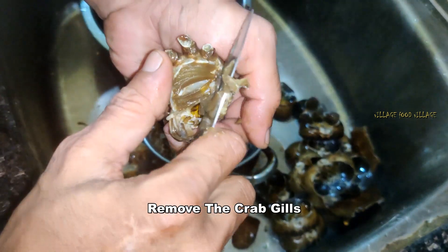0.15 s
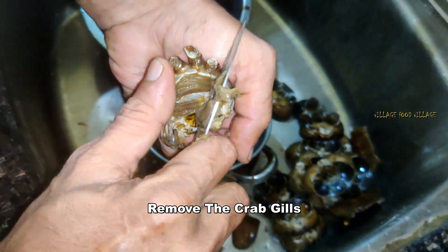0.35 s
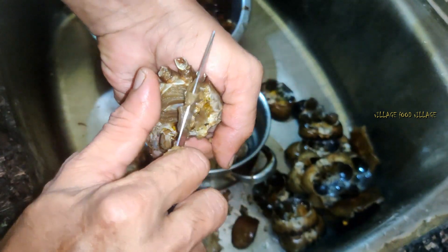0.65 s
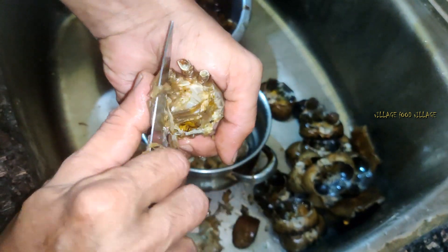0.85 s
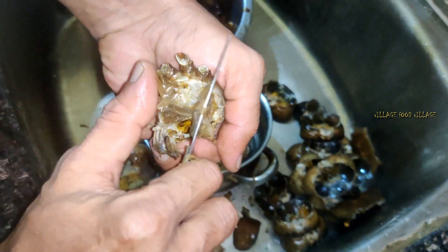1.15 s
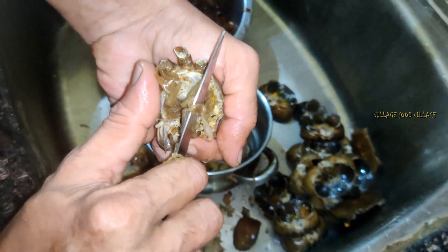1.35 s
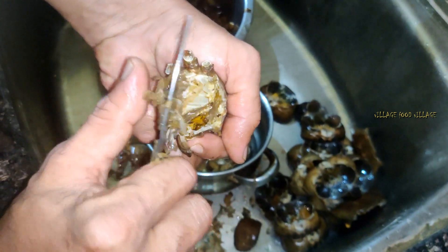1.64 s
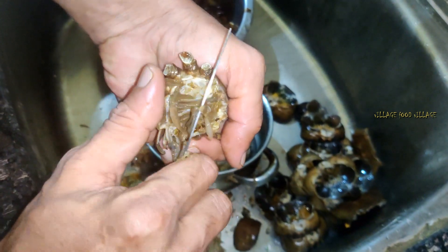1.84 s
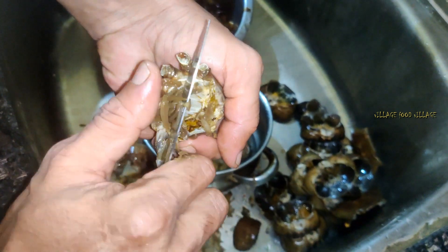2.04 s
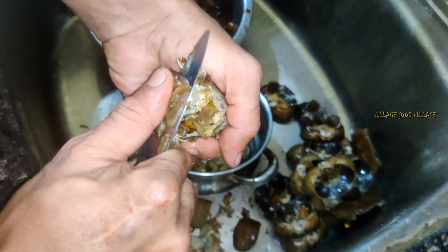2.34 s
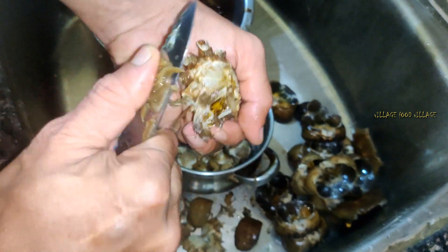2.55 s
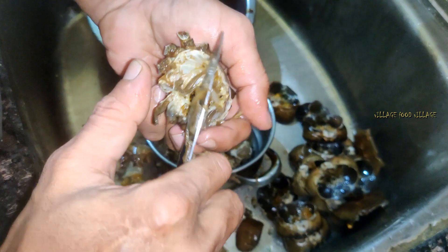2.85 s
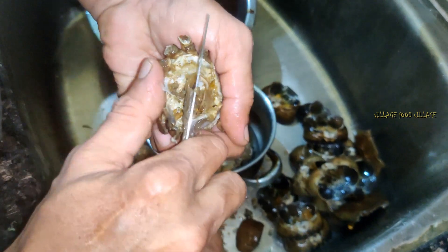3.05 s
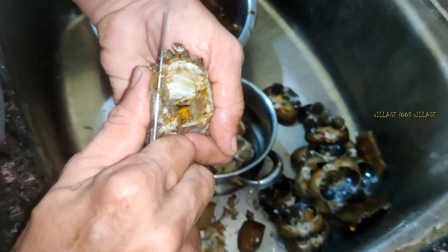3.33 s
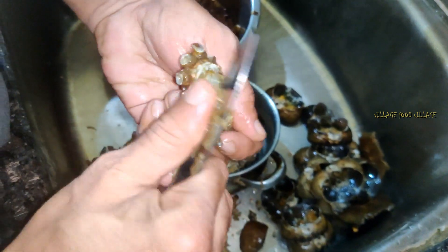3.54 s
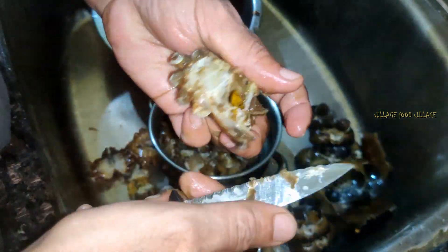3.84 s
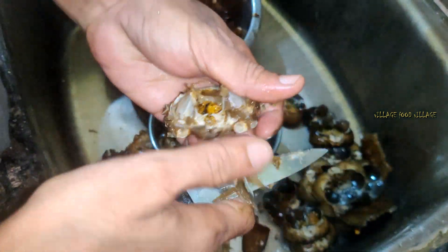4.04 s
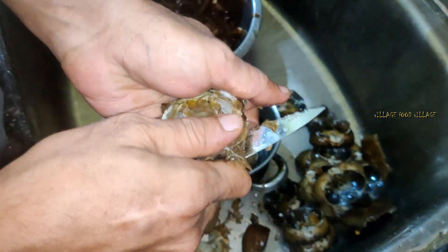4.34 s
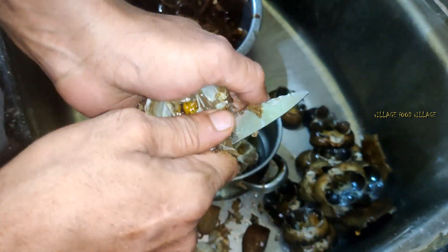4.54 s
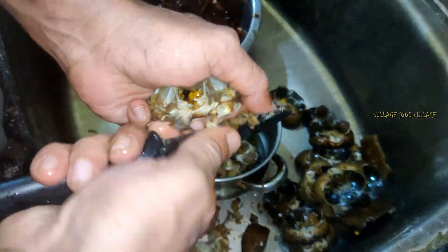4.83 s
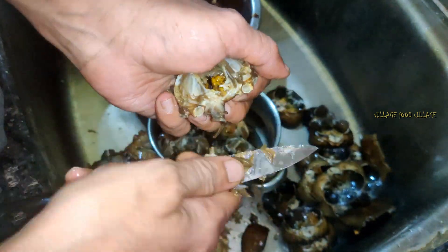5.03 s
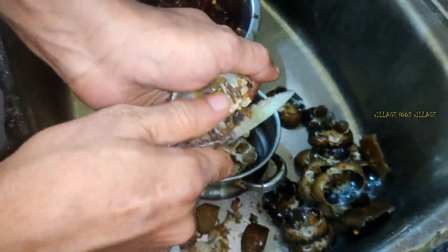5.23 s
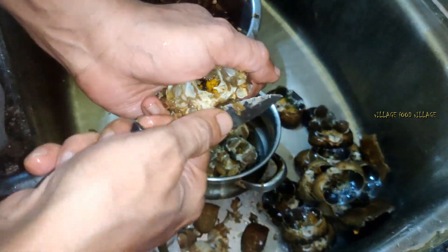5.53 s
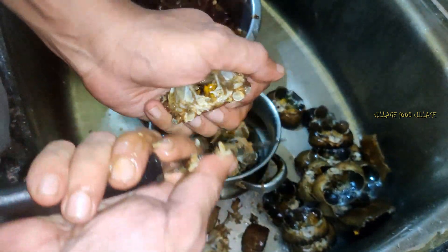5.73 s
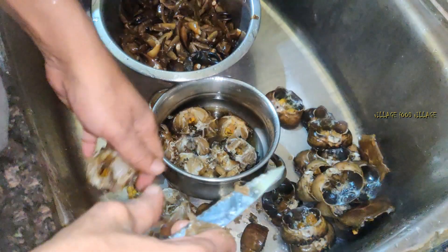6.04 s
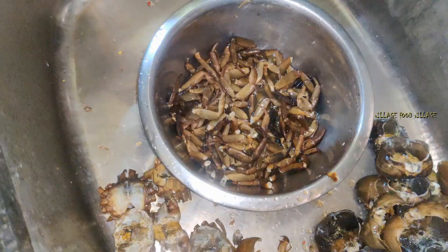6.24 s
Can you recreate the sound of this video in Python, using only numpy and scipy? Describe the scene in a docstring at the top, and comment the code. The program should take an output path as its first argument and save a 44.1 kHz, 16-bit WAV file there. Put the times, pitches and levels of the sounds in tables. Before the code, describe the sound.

Sharp little shell snaps and wet crackling as a knife cleans a crab, then a steel bowl bumps down, over a low hum.

```python
"""Sharp little snaps and a wet crackle sound close by, over a low motor hum in a kitchen.
A small crab is being cleaned over a steel sink: gills and bits of shell snap off under a knife.
Fingers shift their grip on the wet flesh, and two scraps drop and set the sink ringing.
A steel bowl slides, is knocked and bumps down; the sound is cut off, leaving hum, rumble and hiss.
The two microphone ports (its left and right openings) each ring in the treble in their own way."""
import sys
import numpy as np
from scipy import signal
from scipy.fft import rfft, irfft, next_fast_len
from scipy.io import wavfile

SR = 44100
rng = np.random.default_rng(int(sys.argv[2]) if len(sys.argv) > 2 else 0)


def wav_record(signal):
    """Record a signal, one row per channel, as 16-bit PCM in the file named by sys.argv[1]."""
    frames = np.transpose(np.atleast_2d(signal))
    bounded = np.clip(frames, -1, 1)
    # unit amplitude maps onto the largest positive 16-bit level
    quanta = np.round(bounded * 32767).astype(np.int16)
    wavfile.write(sys.argv[1], SR, quanta)


N = 281358
TIME = np.arange(N) / SR
CUT_S = 6.2685   # the moment all sound but the background is cut off

# the shell snapping under the blade: start_s, level_db (near 5 kHz), length_s, brightness_db, pitch_hz
SHELL_SNAPS = [(0.873, -9.5, 0.0033, -8.5, 1980), (1.421, -14.5, .003, -26, 1930),
               (1.5228, -13.5, .0012, 0.5, 1670), (1.532, -8.5, 0.0031, -9, 730),
               (1.887, -13.5, .002, -4, 2050), (1.9403, -3.5, 0.00076, 0, 1870),
               (1.974, -10, 0.0037, -18, 2100), (2.4333, -10.5, 0.0059, -2.5, 2100),
               (3.1834, 5, 0.0013, -2.5, 806), (3.2307, -0.5, 0.0037, -6, 2000),
               (3.239, -3, 0.0036, -16, 5670), (3.452, 0.5, .001, -4, 1740),
               (3.4822, -1.5, 0.0026, -11, 2250), (3.498, -4.5, 0.00099, -16, 2080),
               (3.614, -7.5, .004, -16, 1990), (3.669, -7.5, 0.0071, -19, 1950),
               (3.736, -5, .007, -19, 700), (4.2295, -12, 0.0028, -13, 2080),
               (4.7037, -10, 0.0014, -3, 2040), (4.7322, -2.5, 0.00069, -2.5, 1890),
               (4.779, 0, 0.00088, 0.5, 1800), (4.88, -9.5, 0.0012, -11, 1510),
               (4.895, -13, 0.0013, -16, 1620), (5.3712, -11.5, 0.0008, 5.5, 1950),
               (5.468, -14.5, 0.0041, -2, 1900), (5.4916, -12.5, 0.0012, -13, 1880),
               (5.531, -5.5, .001, -4, 1910), (5.539, -0.5, .0018, -11, 1800),
               (5.568, 5.5, 0.0019, -3, 1720), (5.7355, 1.5, .001, -3, 1540)]
# the tones at which the hand-held shell rings: pitch_hz, width_hz, level_db
SHELL_TONES = [(885, 980, -4), (1640, 270, -3.5), (3960, 1120, -0.5), (5650, 920, 3), (7560, 5000, -1),
               (10470, 3800, -1.5), (14600, 2400, -5)]


def from_db(db):
    """Turn decibels into a factor to multiply by."""
    return 10 ** (np.asarray(db) / 20)


def unit_energy(x):
    """Scale each channel so that its squared samples add up to 1."""
    return x / np.sqrt(np.sum(x ** 2, axis=-1, keepdims=True) + 1e-20)


def rms_one(x):
    """Scale each channel to an average strength (rms) of 1."""
    return unit_energy(x) * np.sqrt(x.shape[-1])


def add(track, start_s, sound):
    """Mix a short sound into a track."""
    at = int(start_s * SR)
    track[..., at:at + sound.shape[-1]] += sound[..., :N - at]


def colour(x, points):
    """Make some pitches louder and others softer, along a curve of (pitch_hz, gain_db) points."""
    size = 2 * next_fast_len(x.shape[-1] // 2 + 4096)
    hz, db = np.transpose(points)
    log_hz = np.log(np.fft.rfftfreq(size, 1 / SR) + 1)
    log_gain = np.log(from_db(np.interp(log_hz, np.log(hz), db)))
    # minimum phase: the filter rings only after a sound, never before it
    cepstrum = irfft(log_gain)
    cepstrum[1:size // 2] *= 2
    cepstrum[size // 2 + 1:] = 0
    return irfft(rfft(x, size) * np.exp(rfft(cepstrum)))[..., :x.shape[-1]]


def resonate(x, tones):
    """Let a sound ring at several tones of (pitch_hz, width_hz, level_db); narrow ones ring longer."""
    out = 0
    for k, (hz, width, db) in enumerate(tones):
        decay = np.exp(-np.pi * width / SR)
        poles = [1, -2 * decay * np.cos(2 * np.pi * hz / SR), decay * decay]
        ring = signal.lfilter([1, 0, -1], poles, x + 1e-18)
        out = out + (-1) ** k * from_db(db) * (1 - decay * decay) / 2 * ring
    return out


def dying_noise(fade_s, size):
    """A blur of echoes, different left and right, that falls by 60 dB in fade_s."""
    return unit_energy(rng.standard_normal((2, size)) * from_db(-60 * TIME[:size] / fade_s))


def struck(tones, spread, tilt_db=0.0, size=16000):
    """One blow rings tones of (pitch_hz, level_db, fade_s); spread puts left and right out of step."""
    t = TIME[:size]
    out = 0
    for hz, db, fade_s in tones:
        phase = np.pi * rng.integers(2) + spread * rng.standard_normal() * np.array([[1], [-1]])
        level_db = db + tilt_db * np.log2(hz / tones[1][0]) + rng.standard_normal()
        out = out + from_db(level_db - 60 * t / fade_s) * np.cos(2 * np.pi * hz * t + phase)
    return out * (1 - np.exp(-t / 0.001))


def grains(per_s, size_spread_db, decay_s):
    """Tiny puffs of noise at random moments, mostly small, a few large."""
    sizes = from_db(size_spread_db * np.minimum(rng.exponential(1, N), 4))
    starts = rng.random(N) < per_s / SR
    puffs = signal.lfilter([1], [1, -np.exp(-1 / (decay_s * SR))], sizes * starts + 1e-18)
    return puffs * rng.standard_normal((2, N))


def swells(rows):
    """A level that rises and falls smoothly for each row of (peak_s, level_db, half_length_s)."""
    return sum(from_db(db) * np.exp(-((TIME - peak_s) / half_s) ** 2) for peak_s, db, half_s in rows)


def drift(rate_hz):
    """Slow random wandering, typically about 1 in size."""
    falloff = 1 / (1 + (np.fft.rfftfreq(N, 1 / SR) / rate_hz) ** 2)
    return rms_one(irfft(rfft(rng.standard_normal(N)) * falloff, N))


def motor_hum(pitch_hz=100, level_db=-57, waver_depth=0.42, waver_hz=3.3):
    """A motor hums on one low note that wavers and now and then dips briefly."""
    # dips in the hum: lowest_s, missing_part_db (0 would be the whole hum), half_length_s
    dips = [(0.72, -3, 0.38), (1.7, -8.5, 0.51), (2.8, -4, 0.18)]
    waver = 1 + waver_depth * (drift(waver_hz) + 1j * drift(waver_hz))   # in level and phase
    tone = np.real(waver * np.exp(2j * np.pi * pitch_hz * TIME))
    return np.sqrt(2) * from_db(level_db) * (1 - swells(dips)) * tone


def kitchen_rumble(level_db=-54.5):
    """The kitchen rumbles; the bass is nearly the same left and right."""
    # tone colour of the rumble: pitch_hz, gain_db
    rumble_colour = [(20, 11.5), (30, 10), (48, -9), (65, 0), (82, -0.5), (125, 5.5), (200, -4.5),
                     (320, -7.5), (600, -11.5), (1200, -16.5), (3000, -36)]
    shared, side = rng.standard_normal((2, N))
    side = colour(side, [(30, -10), (100, -16.0), (300, -5.5), (700, -3.5), (1400, 2.0)])
    return from_db(level_db) * rms_one(colour(shared + side * [[1], [-1]], rumble_colour))


def microphone_hiss(left_db=-57.5, right_db=-56.5, after_cut_db=-3.5):
    """Each microphone makes its own hiss, which turns a little softer at the very end."""
    # tone colour of the hiss: pitch_hz, gain_db
    hiss_colour = [(100, -4.5), (1000, -3.5), (2000, 5.5), (2900, 2.5), (4500, 4.5), (9000, 1.5),
                   (16000, -2)]
    hiss = rms_one(colour(rng.standard_normal((2, N)), hiss_colour))
    return from_db([[left_db], [right_db]]) * hiss * from_db(after_cut_db * (TIME > CUT_S))


def soft_swell():
    """A faint, breath-like swell of soft noise."""
    # the rise and fall of the noise: peak_s, level_db, half_length_s
    swell_shape = [(5.12, -55, 0.21)]
    swell_colour = [(150, -13), (450, -2.5), (850, 0.5), (1500, -7.5), (3000, -20), (9000, -33)]
    return swells(swell_shape) * rms_one(colour(rng.standard_normal((2, N)), swell_colour))


def wet_fingers(holding_db=-65, crackle_db=-6.5, rub_db=-4.5):
    """Tiny films of water burst and skin rubs dully, louder whenever the fingers shift their grip."""
    # shifts of the grip: peak_s, level_db, half_length_s
    grips = [(0.05, -60, .2), (2.2, -56.5, 0.47), (3.8, -49, 0.39), (4.43, -52, 0.14), (4.95, -54, 0.26),
             (5.65, -53, 0.46)]
    film_colour = [(200, -4.5), (900, 8), (2000, 3), (2800, 0), (4000, -4), (8000, -5.5), (15000, -4)]
    rub_colour = [(70, -4.5), (150, -3.0), (280, -8.5), (500, -13), (2000, -26.5)]
    films = grains(per_s=380, size_spread_db=4.5, decay_s=0.0037)
    crackle = from_db(crackle_db) * rms_one(colour(films, film_colour))
    rub = from_db(rub_db) * rms_one(colour(rng.standard_normal(N), rub_colour))
    return (from_db(holding_db) + swells(grips)) * (crackle + rub)


def falling_scraps(ring_db=-9.5, splat_db=38.0):
    """Soft scraps land with a small wet splat and set the sink floor ringing."""
    # scraps hitting the sink: start_s, level_db
    landings = [(2.5736, -38), (2.590, -57), (2.610, -43), (3.733, -38.5), (3.753, -39.5), (3.775, -63)]
    # tones of the sink floor: pitch_hz, level_db, fade_s
    sink_tones = [(337, -20, 0.31), (432, -1.5, 0.35), (528, -1, 0.38), (614, -4.5, 0.32), (788, -10, 0.55),
                  (1020, -16, 0.33), (1285, -6, .2), (1810, 13.5, 0.021), (3040, 2, 0.068)]
    splat_colour = [(150, -15.0), (450, 8.0), (1200, -5.0), (3000, -12.0), (9000, -28)]
    out = np.zeros((2, N))
    for start_s, level_db in landings:
        splat = from_db(splat_db) * colour(dying_noise(fade_s=0.16, size=16000), splat_colour)
        ring = from_db(ring_db) * struck(sink_tones, spread=0.86)
        add(out, start_s, from_db(level_db) * (ring + splat))
    return out


def steel_bowl(clatter_fade_s=0.043, scrape_width_hz=50, lowest_hz=68):
    """The bowl scrapes along; each blow then rings it, booms in the sink and rattles crab legs inside."""
    # the bowl sliding before it knocks: time_s, level_db
    slide = [(6.06, -84), (6.13, -54.5), (6.19, -49), (6.21, -85)]
    # blows, brighter when hard: start_s, ring_db, hardness_db_per_octave, thud_db, clatter_db
    blows = [(6.195, -28.5, -1, -55, -3), (6.2024, -20.5, -9, -26, 1), (6.2359, -29.5, 9, -8, 20.5),
             (6.261, -38, 19, -36, -1)]
    # tones of the bowl: pitch_hz, level_db, fade_s
    bowl_tones = [(388, -10, 0.078), (534, 1.5, 0.18), (654, -2.5, 0.19), (747, 1, 0.082), (847, 0, 0.096),
                  (920, -11, 0.094), (1108, -1, 0.094), (1236, -8, 0.25), (1324, -7, 0.18),
                  (1536, -34, .12), (1800, -23, 0.72)]
    # low tones of the sink booming under it: pitch_hz, level_db, fade_s
    thud_tones = [(114, -10, 0.065), (180, 0, 0.066), (230, 1.5, 0.03), (320, -14, 0.086)]
    clatter_colour = [(60, -8), (250, -7.0), (800, 7), (2200, -3.5), (2800, -15.0), (6000, -14.0),
                      (9000, -18.5), (15000, -27)]
    scrape_tones = [(hz, scrape_width_hz, db) for hz, db, _ in bowl_tones]
    scrape = rms_one(resonate(rng.standard_normal((2, N)), scrape_tones))
    out = from_db(np.interp(TIME, *np.transpose(slide))) * scrape
    for start_s, ring_db, hardness, thud_db, clatter_db in blows:
        clatter = from_db(clatter_db) * colour(dying_noise(clatter_fade_s, size=16000), clatter_colour)
        ring = from_db(ring_db) * struck(bowl_tones, spread=0.79, tilt_db=hardness)
        thud = from_db(thud_db) * struck(thud_tones, spread=0.073)
        add(out, start_s, ring + thud + clatter)
    # thin steel gives off no deep bass
    bass_cut = signal.butter(4, lowest_hz, "high", fs=SR, output="sos")
    return signal.sosfilt(bass_cut, out) * from_db([[0.5], [-0.5]])   # slightly to the left


def shell_crunch(strain_s=0.0028, tearing_s=0.012, crunch_db=-47.5):
    """The shell crackles under strain just before each snap and goes on tearing after it."""
    from_snap_s = TIME[:8820] - .05
    rise_and_fall = np.exp(np.minimum(from_snap_s / strain_s, -from_snap_s / tearing_s))
    strain = np.zeros(N)
    for start_s, level_db, *_ in SHELL_SNAPS:
        add(strain, start_s + from_snap_s[0], from_db(level_db) * rise_and_fall)
    crackle = grains(per_s=450, size_spread_db=6.0, decay_s=0.00095)
    return from_db(crunch_db) * strain * rms_one(resonate(crackle, SHELL_TONES))


def shell_crack(length_s, fewest=4.2, per_s=2000, most=20, size=2048):
    """A crack runs through the shell as tiny breaks, more of them the longer it runs."""
    delays_s = np.minimum(length_s * rng.exponential(1, most), 2.5 * length_s)
    used = np.clip(fewest + per_s * length_s - np.arange(most), 0, 1)
    strengths = from_db(rng.normal(0, 4.0, most)) * used
    delays_s[0], strengths[0] = 0, from_db(3.0)   # a hard first break
    clicks = np.zeros((1, size))
    np.add.at(clicks[0], (delays_s * SR).astype(int) % size, rng.choice([-1, 1], most) * strengths)
    # hands and blade scatter the clicks on their way to the ports
    paths = from_db(1.0) * dying_noise(fade_s=0.026, size=size)
    paths[0, 0] += 1   # the straight path to the left port
    paths[1, 6] += 1   # the right port is a little farther away
    return signal.fftconvolve(clicks, paths, axes=1)[:, :size]


def shell_ring(crack, band_levels_db, hollow_hz, hollow_width_hz=230, hollow_db=9.0):
    """A crack rings the shell and the hollow inside it; four pitch bands each get their own level."""
    # the body, middle, crispness and fizz of a snap: low_hz, high_hz
    bands = [(600, 2500), (3200, 7300), (7300, 11500), (11500, 17000)]
    ring = resonate(crack, SHELL_TONES) - resonate(crack, [(hollow_hz, hollow_width_hz, hollow_db)])
    out = 0
    for (low_hz, high_hz), db in zip(bands, band_levels_db):
        band = signal.sosfilt(signal.butter(3, [low_hz, high_hz], "band", fs=SR, output="sos"), ring)
        out = out + from_db(db) * np.sqrt(2 * (high_hz - low_hz) / SR) * unit_energy(band)
    return out


def knife_snaps(flesh_db=-43.0):
    """The knife snaps the shell and jolts the flesh; gives the close sound and what enters the room."""
    flesh_tones = [(237, -1.0, 0.049), (746, -1.5, 0.024)]
    close, into_room = np.zeros((2, 2, N))
    for start_s, level_db, length_s, brightness_db, hollow_hz in SHELL_SNAPS:
        body_db = -3 - 0.37 * level_db   # hard snaps sound thinner
        crisp_db = 2.0 + 0.55 * brightness_db
        crack = shell_crack(length_s)
        # taken over all directions, the tiny breaks act as one smooth click
        click = signal.unit_impulse(crack.shape[1])
        band_levels_db = [body_db, 0, crisp_db, brightness_db]
        snap = from_db(level_db) * shell_ring(np.vstack([crack, click]), band_levels_db, hollow_hz)
        add(close, start_s, snap[:2])
        add(into_room, start_s, snap[2])
        jolt = from_db(flesh_db + (level_db + body_db) / 2) * struck(flesh_tones, spread=0.45)
        add(close, start_s, jolt)
    return close, into_room


def kitchen_echoes(x, basin_db=-9.5, basin_fade_s=0.17, room_db=-9.5, room_fade_s=0.64):
    """Sound bounces quickly around the steel basin and dies away, duller and slower, in the room."""
    # tones of the basin: pitch_hz, width_hz, level_db
    basin_tones = [(2090, 360, 10), (4250, 440, 3.5), (5730, 190, -3)]
    room = colour(dying_noise(room_fade_s, size=SR), [(6000, 0), (12000, -6.0)])
    bounces = dying_noise(basin_fade_s, size=SR)
    ring = resonate(dying_noise(basin_fade_s, size=SR), basin_tones)
    echoes = from_db(basin_db) * (bounces + ring) + from_db(room_db) * room
    build_up = 1 - np.exp(-TIME[:SR] / 0.0037)
    return signal.fftconvolve(x, echoes * build_up, axes=1)[:, :N]


def scene(after_cut_db=-15.0, decay_s=0.017):
    """The sounds at the sink and their echoes are cut off abruptly at the end; the background stays."""
    snaps, into_room = knife_snaps()
    others = shell_crunch() + wet_fingers() + soft_swell() + falling_scraps() + steel_bowl()
    foreground = snaps + others + kitchen_echoes(into_room + others)
    dying = from_db(after_cut_db) * np.exp(-np.maximum(TIME - CUT_S, 0) / decay_s)
    drone = (motor_hum() + kitchen_rumble()) * from_db([[-.9], [.9]])   # slightly to the right
    return foreground * np.where(TIME < CUT_S, 1, dying) + drone + microphone_hiss()


def record(dry, highest_hz=15900):
    """The microphone ports ring in the treble, loud peaks are rounded and the very top is cut."""
    # tone colour of the left and of the right port: pitch_hz, gain_db
    left_port = [(3000, -1.5), (4200, 3), (5000, 5), (5800, 12.5), (6400, 10.5), (7200, 4), (9000, -2.5),
                 (12000, -4), (13700, -5.5), (16000, 5)]
    right_port = [(3000, -0.5), (5000, 0), (6500, 6.5), (7600, 9), (8800, 20), (10000, 10.5), (12300, 2.5),
                  (15200, 11), (16000, -40)]
    coloured = np.array([colour(dry[0], left_port), colour(dry[1], right_port)])
    treble_cut = signal.ellip(10, .2, 80, highest_hz, fs=SR, output="sos")
    return signal.sosfilt(treble_cut, np.tanh(coloured))


dry = scene()
out = record(dry)
wav_record(out)
```